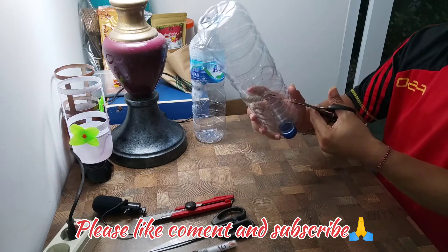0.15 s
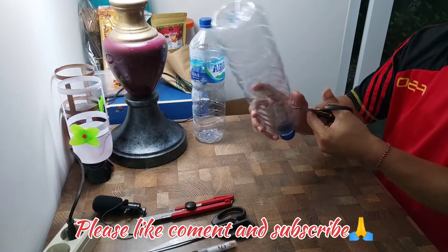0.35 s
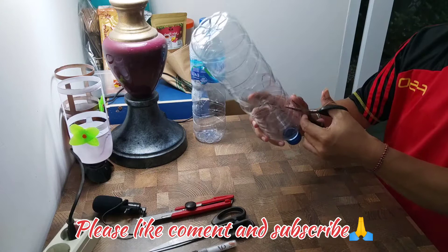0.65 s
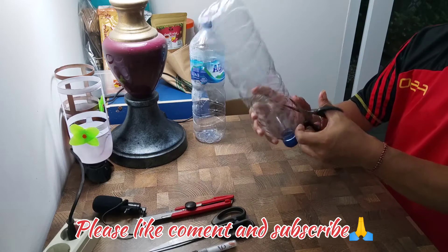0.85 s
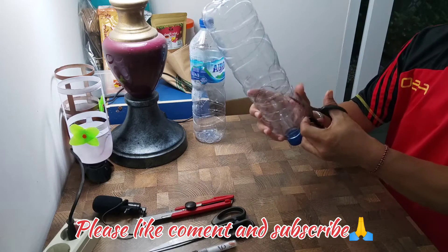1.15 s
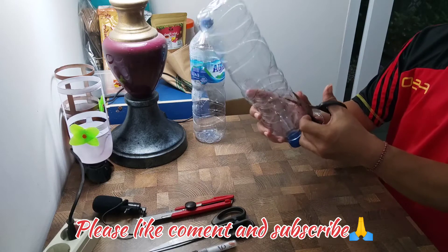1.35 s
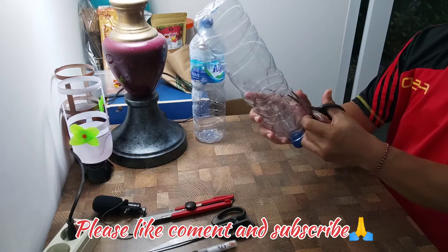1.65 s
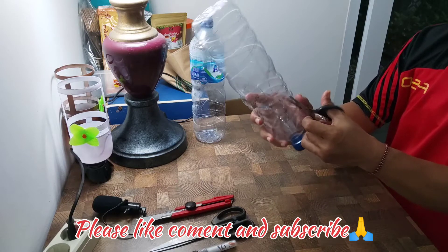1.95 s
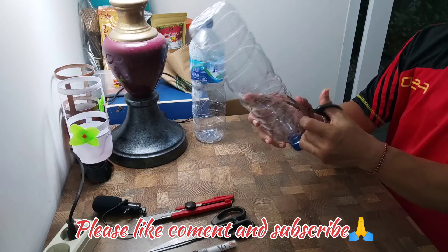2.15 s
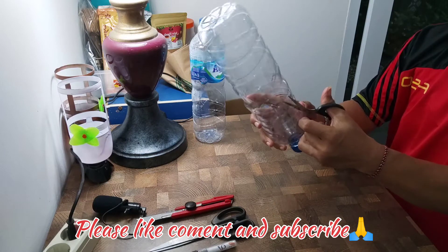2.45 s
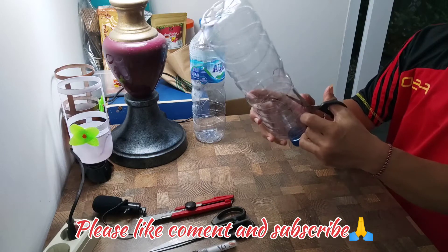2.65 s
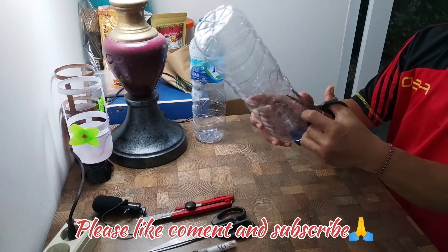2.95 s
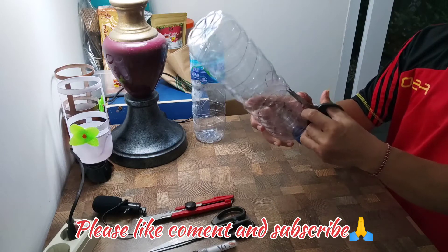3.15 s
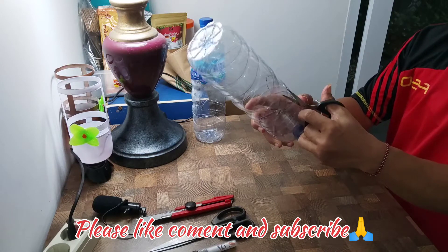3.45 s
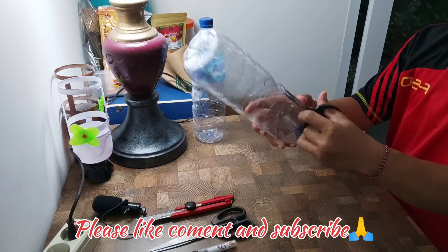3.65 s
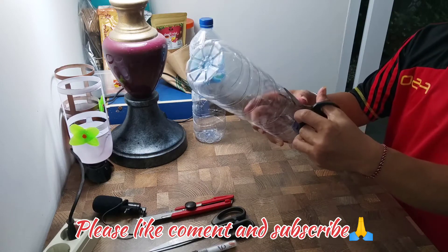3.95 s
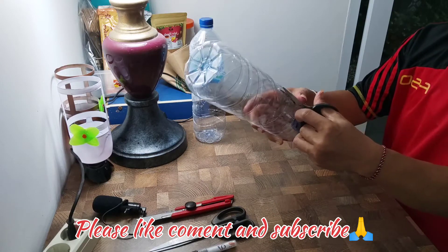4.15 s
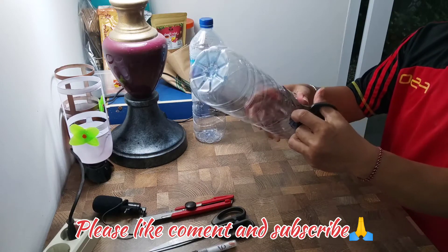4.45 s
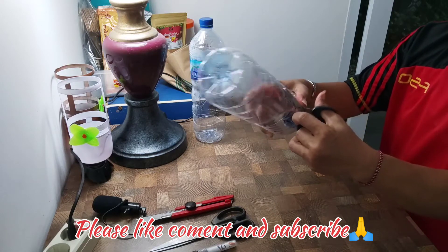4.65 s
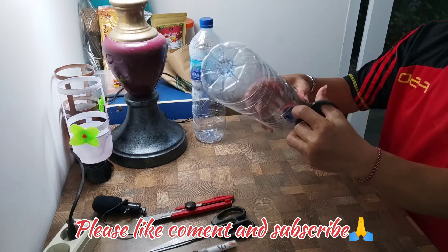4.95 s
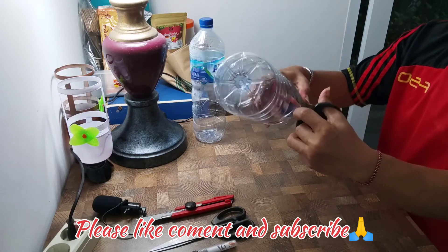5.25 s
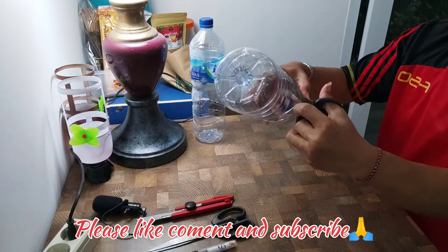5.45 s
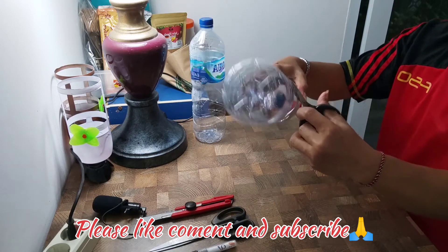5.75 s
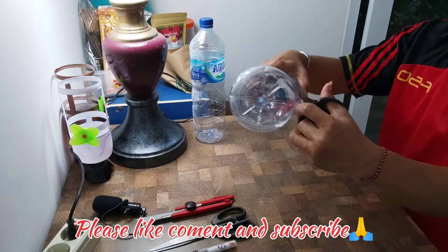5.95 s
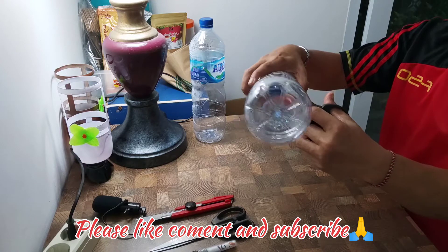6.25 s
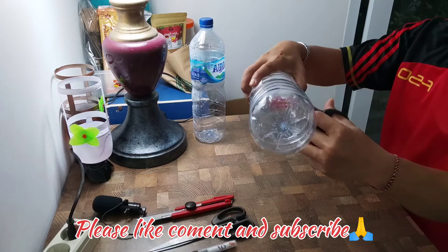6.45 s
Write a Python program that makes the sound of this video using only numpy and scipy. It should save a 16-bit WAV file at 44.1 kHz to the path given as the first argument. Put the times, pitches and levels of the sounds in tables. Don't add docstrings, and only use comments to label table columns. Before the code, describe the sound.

Scissors cut a thin, hollow plastic bottle in irregular crisp snaps and crackles, with faint scraping and finger rustle in a bare, echoing room.

```python
import sys
import numpy as np
from scipy import signal
from scipy.fft import rfft, irfft
from scipy.io import wavfile
from scipy.ndimage import uniform_filter1d

SR = 44100
rng = np.random.default_rng(int(sys.argv[2]) if len(sys.argv) > 2 else 0)


def boost_factor(decibels):
    exponent = np.asarray(decibels, float) / 20
    return 10 ** exponent


def transcribe(u):
    v = np.clip(np.atleast_2d(u).T, -1, 1)
    q = np.round(v * 32767).astype(np.int16)
    wavfile.write(sys.argv[1], SR, q)


N = 290619

# t/s, wall level/dB, body level over wall/dB, crack level over wall/dB, panel f/Hz
CUTS = [(0.079, -14, 1.5, -28, 2400), (0.357, -3.5, -8, -19.5, 2850), (0.405, -21.5, 0.5, -12.5, 3100),
        (0.994, -14.5, -11, -16.5, 1750), (1.043, -17.5, 1, -21, 2240), (2.458, 5, -10.5, -20, 1088),
        (2.492, -6.5, -2.5, -11, 1060), (2.711, -12.5, -15, 3.5, 6300), (3.317, -3, -5.5, -14.5, 2090),
        (3.346, -9, 1.5, -12.5, 2290), (3.771, -15.5, 4.5, -16, 1150), (3.81, -1.5, -0.5, -34, 1167),
        (4.232, -13.5, -10, -30, 1580), (4.266, -6.5, -6, -15, 813), (4.348, -12, 1.5, -34, 1580),
        (4.617, -10, -4, -20.5, 1990), (4.666, -3.5, -13, -21, 2300), (4.712, -6, -5.5, -9, 2250),
        (4.72, -9.5, -4, -12, 2220), (5.148, -8.5, -8.5, -18, 1720), (5.718, -4, -6, -16, 860),
        (6.224, 1.4, -5.5, -15.5, 1800), (6.576, -4, -17, -51, 1080)]


def cuts():
    return [(s, wall, wall + body, wall + crack, hz, 0.022 - 0.0015 * body)
            for s, wall, body, crack, hz in CUTS]


# t/s, body level/dB, wall level over body/dB, panel f/Hz
DENTS = [(0.016, -27.5, -1, 1600), (0.529, -22, -2.5, 2580), (0.612, -23, -12, 3260),
         (1.176, -27, -1, 2600), (1.199, -28.5, 2, 910), (1.229, -16.5, -5, 2490), (1.336, -27, -10, 1340),
         (1.362, -28, -2.5, 902), (1.576, -32, -6, 1340), (2.249, -32, -2, 1280), (3.185, -22.5, -3, 2940),
         (3.219, -25.5, 0.5, 910), (3.613, -26.5, 7, 823), (3.971, -37.5, -4, 1360), (4.651, -26, 6, 1390),
         (5.785, -19, 7, 1260), (5.86, -23, -1, 1100), (5.9, -36, 6, 1000), (6.014, -28, -5.5, 1360),
         (6.141, -33, 10, 1420), (6.348, -24, 5.5, 980), (6.42, -17.5, -9, 1360), (6.49, -14, -8.5, 886),
         (6.56, -22, 1, 902)]


def dents():
    crack_over_wall_db = -32.5
    return [(s, body + wall, body, body + wall + crack_over_wall_db, hz, 0.031)
            for s, body, wall, hz in DENTS]


# t/s, wall level/dB, crack level over wall/dB, panel f/Hz
TICKS = [(0.187, -29.5, -14, 990), (1.509, -28.5, -6, 3530), (1.6, -29, -18.5, 1840),
         (2.722, -20, -7.5, 3040), (2.737, -24, -6, 2820), (3.807, -8, -30, 2000), (5.391, -28, -13, 1430),
         (5.571, -26.5, -38, 3950), (5.718, -5.5, -14.5, 4600), (5.911, -15.5, -15, 885),
         (6.367, -18, -14, 1326)]


def ticks():
    body_over_wall_db = -29
    return [(s, wall, wall + body_over_wall_db, wall + crack, hz, 0.018)
            for s, wall, crack, hz in TICKS]


# f/Hz, level/dB, t60/s
BODY_MODES = [(285, -15.5, 0.023), (357.6, -1.5, 0.047), (404, 0.26, 0.053), (453.6, -2, 0.047),
              (494, -4.5, 0.044), (614, -7, 0.048)]
# f/Hz, level/dB, t60/s
WALL_MODES = [(795, -2, .03), (1070, -2, .03), (1350, -4, .025), (1965, -1, .03), (2400, -6, .02),
              (4480, -8, .015)]
# f/Hz, level/dB per Hz
WALL_COLOUR = [(400, -54), (750, 8.5), (1100, -2), (1500, -1), (2000, -6), (2800, -3.5), (4000, -10),
               (6000, -27), (12000, -74)]
# f/Hz, level/dB per Hz
CRACK_COLOUR = [(1500, -5.5), (3000, -1), (4500, -1.5), (6600, 0.5), (7600, -3), (9000, -11), (12000, -20),
                (16500, -32)]


def snap(wall_db, body_db, crack_db, panel_hz, ring_s):
    t = np.arange(3000) / SR
    chance = rng.standard_normal(30)

    push = np.r_[np.zeros(45), np.hanning(56)]
    body = signal.fftconvolve(struck(BODY_MODES, t, chance, 0.043, 5.5), push)[:3000]
    shell = struck(WALL_MODES, t, chance, 0.013, 2.8)
    wall = burst(boost_factor(-60 * t / ring_s), WALL_COLOUR, panel_hz, 6.6)

    cycles = np.minimum(ring_s * panel_hz, 40.0)
    pair = [(0.966 * panel_hz, -4, cycles / panel_hz), (0.977 * panel_hz, 0, 1.18 * cycles / panel_hz)]
    panel = struck(pair, t, chance, 0.016, 0.0)
    panel_db = wall_db - 8.5 - 0.2 * (crack_db - wall_db + 25.5)

    crack_hz = 4700 * (panel_hz / 2000) ** 0.35 * 1.21 ** chance[9]
    crack = burst(boost_factor(-60 * t / 0.023), CRACK_COLOUR, crack_hz, 5.7)
    return (boost_factor(body_db - 0.5) * peak_one(body)
            + boost_factor(wall_db - 5.0) * wall
            + boost_factor(wall_db - 11.0) * peak_one(shell)
            + boost_factor(panel_db) * peak_one(panel)
            + boost_factor(crack_db + 9.5) * crack)


def struck(modes, t, chance, detune, spread_db):
    hz, db, t60 = np.transpose(modes)[:, :, None]
    hz = hz * (1 + detune * chance[:len(modes), None])
    decay_db = db + spread_db * chance[-len(modes):, None] - 60 * t / t60
    sines = boost_factor(decay_db) * np.sin(2 * np.pi * hz * t)
    return sines.sum(axis=0) * (1 - np.exp(-t / 0.00026))


def burst(shape, colour, centre_hz, lean_db):
    size = len(shape)
    phase = np.angle(rfft(rng.standard_normal(size) * shape))
    hz = np.fft.rfftfreq(size, 1 / SR) + 1
    octaves_off = np.minimum(np.abs(np.log2(hz / centre_hz)), 2.5)
    noise = irfft(boost_factor(at_hz(colour, hz) - lean_db * octaves_off) * np.exp(1j * phase), size)
    onset = 1 - np.exp(-np.arange(size) / SR / 0.00012)
    return peak_one(noise * shape ** 0.36 * onset)


def snaps():
    out, gain_db = np.zeros(N + 4096), ducking()
    for s, *settings in cuts() + dents() + ticks():
        at = round((s + 0.000998) * SR)
        out[at:at + 3000] += snap(*settings) / boost_factor(gain_db[at])
    return out[:N]


# t/s, length/s, wall level/dB, body level over wall/dB
SHEARS = [(0.371, 0.04, -41.5, 10.5), (0.601, 0.049, -51, 4.5), (0.905, 0.018, -52.5, 2),
          (0.967, 0.026, -46.5, 5), (1.098, 0.025, -43, -3), (1.288, 0.059, -41.5, -3.5),
          (1.822, 0.019, -52.5, 5), (1.855, 0.037, -47, 3), (1.897, 0.028, -54.5, 9),
          (2.036, 0.054, -37.5, 1), (2.205, 0.053, -46.5, 4.5), (2.262, 0.057, -41.5, -9),
          (2.545, 0.13, -31, -5), (3.181, 0.057, -42, -2.5), (3.606, 0.058, -37.5, -3),
          (3.73, 0.093, -35, 1.5), (4.164, 0.045, -46, 9), (4.218, 0.046, -37, 6.5),
          (4.346, 0.036, -32.5, 4.5), (4.557, 0.045, -39, 1.5), (5.07, 0.04, -43.5, 3),
          (5.115, 0.024, -35.5, -2), (5.159, 0.04, -41, 2.5), (5.625, 0.025, -54, 2),
          (5.67, 0.045, -45, -7), (5.73, 0.044, -40.5, 5), (5.836, 0.12, -40, 6), (6.558, 0.021, -40, 6)]


def shears():
    return strokes(SHEARS, blade_db=-6, fade_db=-4.5)


# t/s, length/s, wall level/dB, body level
# over wall/dB
SLIDES = [(0, 0.049, -41.5, -2), (0.081, 0.067, -48, -2), (0.532, 0.016, -44.5, 6.5),
          (2.418, 0.037, -36.5, 3), (3.826, 0.1, -49.5, 18), (3.956, 0.026, -37, 1),
          (4.685, 0.023, -29.5, -4.5), (5.25, 0.11, -42, 1.5), (5.375, 0.016, -40, -10),
          (5.466, 0.015, -52, 3), (5.788, 0.018, -38, 10), (6.001, 0.035, -51, 13.5),
          (6.081, 0.026, -46.5, 10), (6.339, 0.037, -33.5, 2.5), (6.409, 0.023, -39.5, 4),
          (6.49, 0.022, -39, 9)]


def slides():
    return strokes(SLIDES, blade_db=-15.5, fade_db=-7.5)


def strokes(table, blade_db, fade_db):
    rows, cut_s = [], np.array(CUTS)[:, 0]
    for s, length, wall, body in table:
        loads = np.any((cut_s > s + length / 2) & (cut_s < s + length + 0.03))
        rows.append((s, length, wall + body, wall, wall + blade_db, 5.5 if loads else fade_db))
    return rows


# f/Hz, level/dB, t60/s
BLADE_MODES = [(4170, 0.81, 0.0064), (5720, 1, 0.018), (6200, -2, 0.017)]
# f/Hz, level/dB per Hz
BLADE_COLOUR = [(1500, -10), (3000, 4.5), (4500, -4.5), (6600, -2.5), (7800, -5), (9500, -13), (13000, -23),
                (16500, -33)]


def rubs():
    force = np.zeros((3, N))
    for s, length, *part_db, rise_db in shears() + slides():
        a = max(round((s - 0.13 * length) * SR), 0)
        b = round((s + 1.207 * length) * SR)
        swell = np.sin(np.linspace(0, np.pi, b - a)) ** 0.73
        slope_db = rise_db * np.linspace(-0.5, 0.5, b - a)
        force[:, a:b] += boost_factor(np.array(part_db)[:, None] + 1.0 + slope_db) * swell
    return (force[0] * rubbed(BODY_MODES, WALL_COLOUR, 500, 0.76, 20.0, 3.4, 1.0)
            + force[1] * rubbed(WALL_MODES, WALL_COLOUR, 1300, 0.56, 0.64, 4.0, 3.9)
            + force[2] * rubbed(BLADE_MODES, BLADE_COLOUR, 2500, 0.28, -7.5, 3.3, 7.8))


def rubbed(modes, colour, slips_per_s, damping, clear_db, flutter_db, patchy_db):
    slips = (rng.random(N) < slips_per_s / SR) * rng.standard_normal(N)
    slips = slips + 0.064 * rng.standard_normal(N)

    clear = np.zeros(N)
    for k, (hz, mode_db, t60) in enumerate(modes):
        r, w = boost_factor(-60 / (t60 * damping * SR)), 2 * np.pi * hz / SR
        resonance = signal.lfilter([1, 0, -1], [1, -2 * r * np.cos(w), r * r], slips)
        clear += (-1) ** k * boost_factor(mode_db) * rms_one(resonance)

    packed, edges = np.zeros(N), 350 * 2 ** np.arange(0, 6, 0.5)
    shaken = coloured(rng.permutation(slips), colour)
    for low, high in zip(edges, edges[1:]):
        band = signal.sosfilt(signal.butter(1, [low, high], "band", fs=SR, output="sos"), shaken)
        packed += boost_factor(patchy_db * drift(22)) * band
    return boost_factor(flutter_db * drift(90)) * rms_one(boost_factor(clear_db) * rms_one(clear) + rms_one(packed))


# f/Hz, t60/s
ROOM_T60 = [(200, 0.86), (530, 0.75), (1390, 1), (3680, 0.86), (7000, 0.89), (10000, 0.44), (15000, 0.91)]
# f/Hz, level/dB
ROOM_COLOUR = [(200, -17.5), (530, -18), (1390, -17), (3680, -19.5), (9700, -19.5), (15000, -15)]
# delay t/s, level/dB
ECHOES = [(.0071, -25.5), (0.0118, -19), (0.0288, -18)]


def room(x):
    t, edges = np.arange(SR) / SR, 150 * 2 ** np.arange(0, 7, 0.5)
    white, tail = rng.standard_normal((2, SR)), np.zeros(SR)
    for k, (low, high) in enumerate(zip(edges, edges[1:])):
        band = signal.sosfilt(signal.butter(2, [low, high], "band", fs=SR, output="sos"), white[k % 2])
        hz = np.sqrt(low * high)
        tail += band * boost_factor(at_hz(ROOM_COLOUR, hz) - 60 * t / at_hz(ROOM_T60, hz))
    tail *= boost_factor(-23.5) * (1 - np.exp(-(t / 0.015) ** 2))
    for delay, db in ECHOES:
        tail[round(delay * SR)] += boost_factor(db)
    return signal.fftconvolve(x, tail)[:N]


# f/Hz, level/dB per Hz
FLOOR_COLOUR = [(12, -40), (20, 11.5), (52, 2.5), (156, -6.5), (281, -6), (382, -1.5), (551, -14),
                (816, -6), (1080, -13), (1950, -16), (12800, -46.5), (14300, -53.5), (16500, -75)]
# f/Hz, level/dB
WHINE = [(9456.7, -90), (10054.7, -90), (10115, -91)]


def background():
    air = coloured(rng.standard_normal(N), FLOOR_COLOUR)
    t, step_hz = np.arange(N) / SR, 1256.8
    lines = [(f + k * step_hz, db) for f, db in WHINE for k in range(5)]
    whine = sum(boost_factor(db) * np.sin(2 * np.pi * (f * t + rng.random())) for f, db in lines)
    return boost_factor(-45.5 + 1.0 * drift(3.1)) * rms_one(air) + boost_factor(5.5) * whine


def coloured(x, colour):
    hz = np.fft.rfftfreq(x.shape[-1], 1 / SR)
    return irfft(rfft(x) * boost_factor(at_hz(colour, hz + 1)), x.shape[-1])


def at_hz(points, hz):
    table_hz, value = np.transpose(points)
    return np.interp(np.log(hz), np.log(table_hz), value)


def drift(rate_hz):
    knots = rng.standard_normal(2000)
    return np.interp(np.arange(N) / SR * rate_hz, np.arange(2000), knots)


def rms_one(x):
    return x / np.sqrt(np.mean(x ** 2) + 1e-20)


def peak_one(x):
    return x / np.abs(x).max()


# from t/s, to t/s, first level/dB, last level/dB
DUCKS = [
    (2.451, 2.542, -5, -7),
    (2.703, 2.805, -13, -11),
    (3.316, 3.334, -3.5, 6),
    (4.685, 4.735, -7.5, 2.5),
    (5.693, 5.737, 2, 1),
    (6.217, 6.243, -1, 6),
]


def ducking():
    db = np.zeros(N)
    for start, end, first_db, last_db in DUCKS:
        a, b = round(start * SR), round(end * SR)
        db[a:b] = np.linspace(first_db, last_db, b - a)
    return uniform_filter1d(db, size=130)


def scene():
    no_bass = signal.butter(6, 258, "high", fs=SR, output="sos")
    bottle = signal.sosfilt(no_bass, snaps() + rubs())
    return (bottle + room(bottle) + background())[None]


def top_cut(x):
    return signal.sosfilt(signal.butter(12, 16840, fs=SR, output="sos"), x)


def record(dry):
    ducked = dry * boost_factor(ducking())
    rounded = ducked / (1 + (ducked / 0.95) ** 4) ** (1 / 4)
    mix = signal.sosfilt(signal.cheby2(10, 60, 16800, fs=SR, output="sos"), rounded)
    return top_cut(mix)


dry = scene()
out = record(dry)
transcribe(out)
```